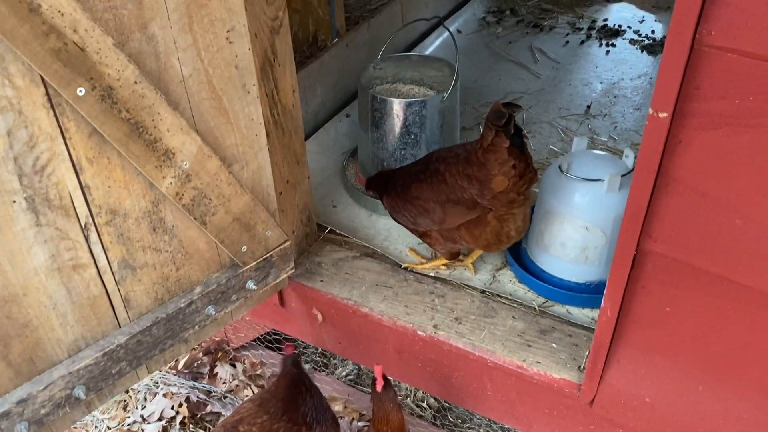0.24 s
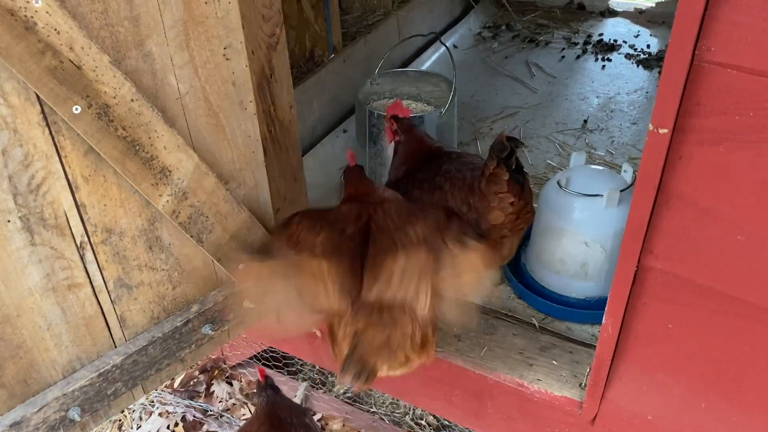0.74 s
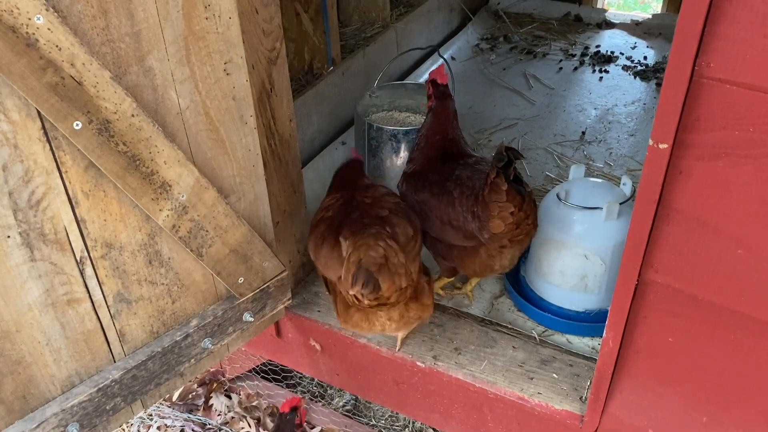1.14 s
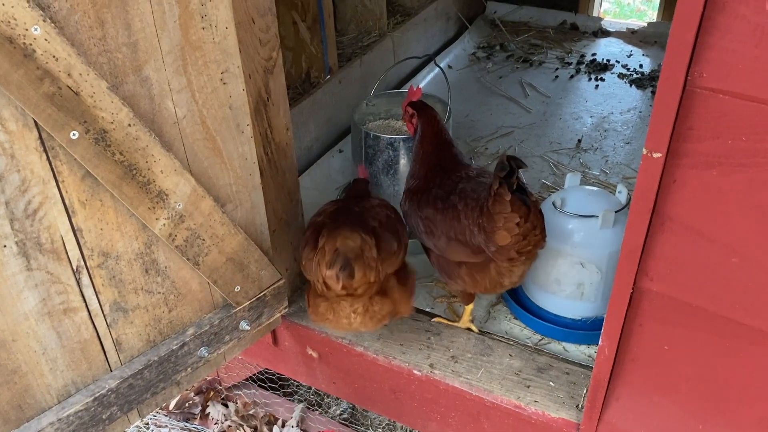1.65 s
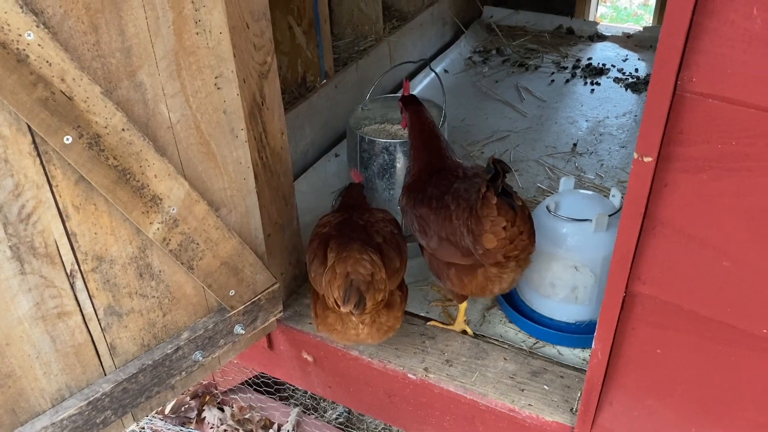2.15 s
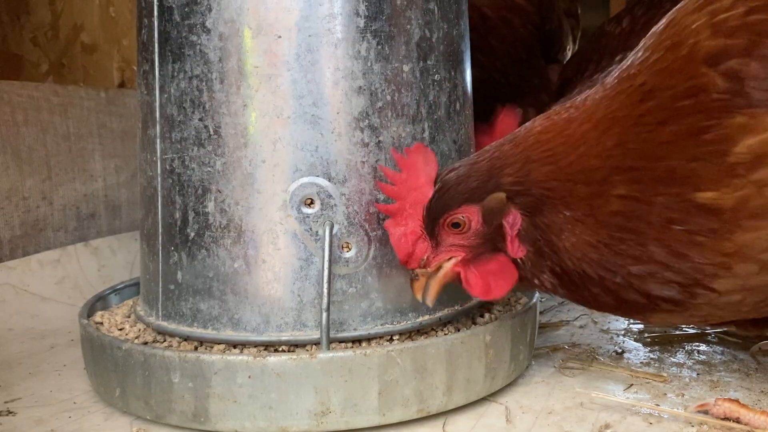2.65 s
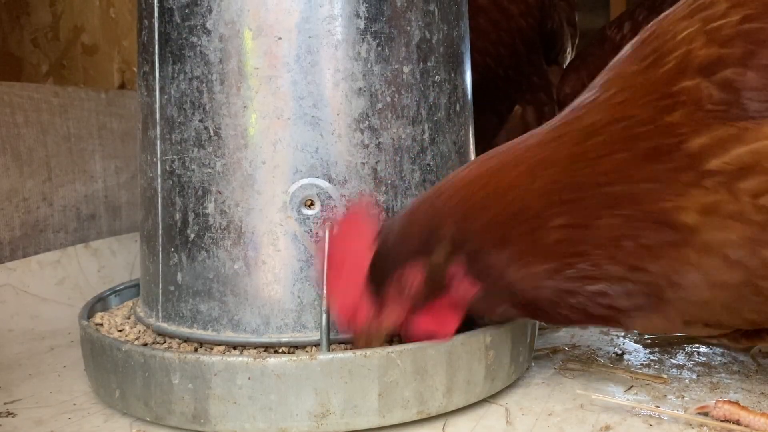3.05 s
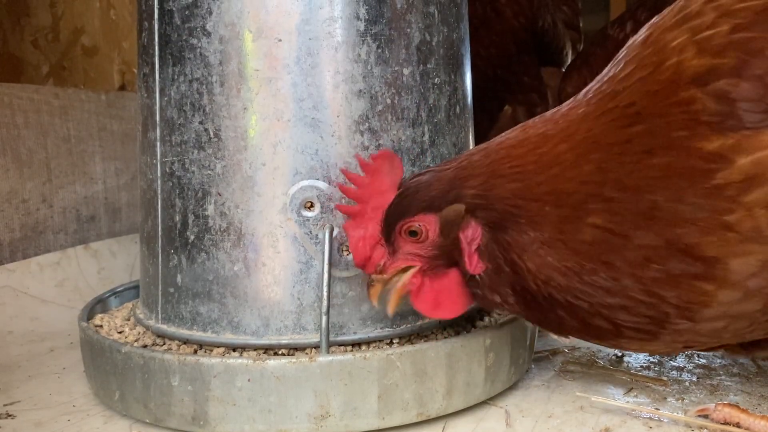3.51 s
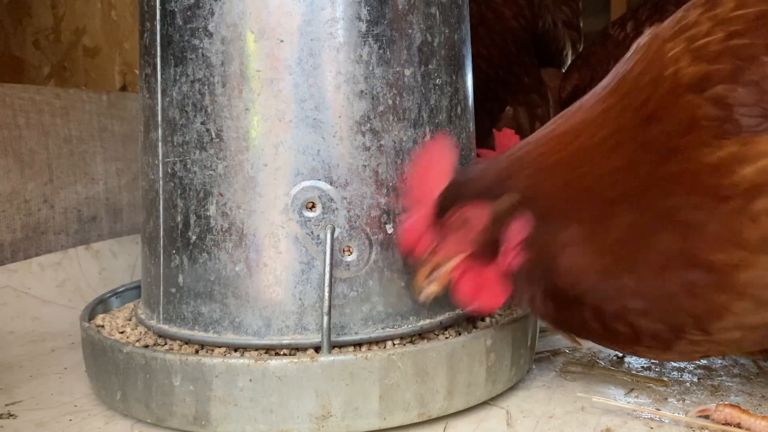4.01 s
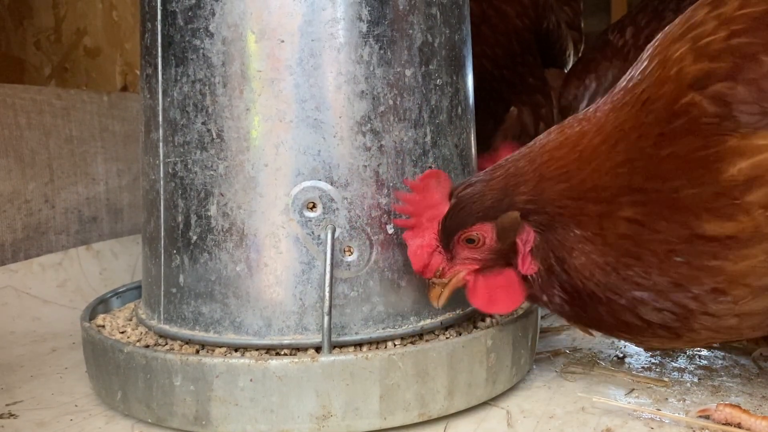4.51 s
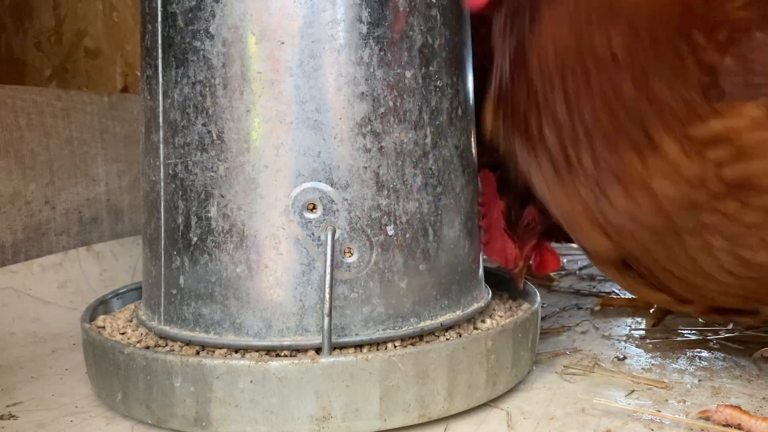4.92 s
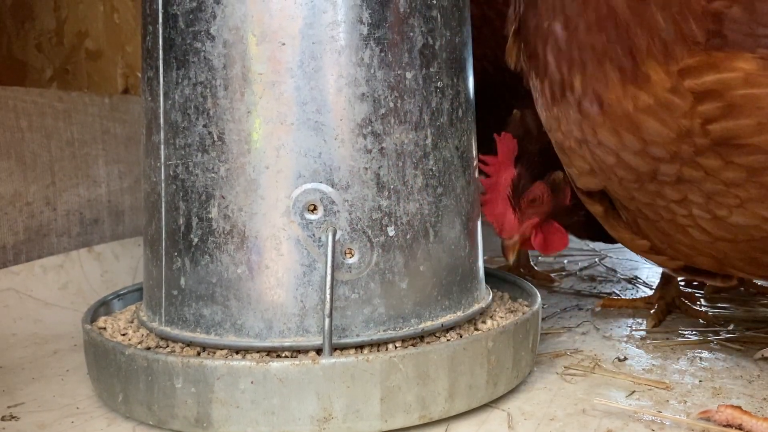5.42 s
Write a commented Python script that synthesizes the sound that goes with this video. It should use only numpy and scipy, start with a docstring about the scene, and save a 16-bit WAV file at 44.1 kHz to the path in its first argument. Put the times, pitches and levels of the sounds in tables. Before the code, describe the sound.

In a small wooden chicken coop, straw and feathers rustle, claws tap and feet knock on hollow boards while hens cluck briefly. A swell of scratchy handling noise brushes the microphone and cuts off. The rest is close-up feeding: a hen's beak ticks against a metal pan, crunching and shifting pellets, and clacks between pecks as she swallows. The pan occasionally rings lightly, over a soft low rumble and quiet yard air.

```python
"""A hen pecks pellets from a steel feeder pan, close up: each peck is a hard tap and a short crunch of
feed, coloured by the damped pan, and between pecks her beak clacks as she swallows.
Before that, hens scuffle through litter, flap up into a wooden coop, thud on its hollow floor and cluck
(throat pulses through resonances), and a hand rubs on the camera. Under it all the coop rumbles and
booms in faint outdoor air, and its close walls add a short tail."""
import sys
import numpy as np
from scipy import signal
from scipy.fft import rfft, irfft
from scipy.io import wavfile
from scipy.ndimage import uniform_filter1d

SR = 44100
rng = np.random.default_rng(int(sys.argv[2]) if len(sys.argv) > 2 else 0)


def master_out(mix):
    """Clip the mix to full scale and print it as 16-bit PCM to the path in sys.argv[1]."""
    frames = np.transpose(np.atleast_2d(mix))
    ceiling = np.clip(frames, -1, 1)
    pcm = np.round(ceiling * 32767).astype(np.int16)
    wavfile.write(sys.argv[1], SR, pcm)


N = 249914
HZ = np.fft.rfftfreq(N, 1 / SR)
NOW = np.arange(N) / SR
CLOSE_UP_S = 2.27  # from here on the microphone is next to the pan

# feed or litter giving way: t/s, length/s, level/dB, brightness/dB
CRUNCHES = [(0.248, 0.028, -48, 3), (0.392, 0.027, -51, 6.5), (0.518, 0.0097, -48.5, 8.5),
            (0.545, 0.023, -42.5, -3), (.57, 0.033, -42.5, -3), (.892, 0.03, -54.5, -17.5),
            (1.462, 0.018, -51, -8), (1.633, 0.0058, -51.5, -0.5), (2.377, 0.028, -53, -2.5),
            (2.755, 0.02, -45, 0.5), (2.951, .02, -61, -6), (2.971, 0.011, -52.5, -1),
            (3.013, 0.013, -48, 0), (3.269, 0.024, -50.5, -5), (3.532, 0.01, -50, -2),
            (3.578, 0.017, -50.5, -8), (3.646, .02, -66, 1.5), (3.688, 0.022, -62, 3),
            (3.78, 0.011, -55, -9.5), (3.826, 0.018, -61.5, -2.5), (3.884, 0.018, -53, -7.5),
            (4.225, 0.013, -51, -10.5), (4.386, 0.014, -53, 0.5), (4.558, 0.0089, -52, -0.5),
            (4.959, .021, -52, 2), (4.995, .037, -56, 3), (5.608, 0.021, -60.5, -4.5),
            (5.645, 0.011, -54, -5)]
# the beak snapping shut: t/s, mouth level/dB, tick level/dB
CLACKS = [(1.1414, -71, -56), (1.309, -63, -50.5), (2.495, -52, -55), (2.509, -52, -58.5),
          (2.539, -58, -54), (2.7244, -57, -50.5), (2.731, -48, -68), (2.8806, -77, -59),
          (2.8983, -63, -60), (3.1155, -61, -66), (3.1427, -58, -59), (3.3838, -49.5, -53),
          (3.4006, -47, -53.5), (3.44, -59, -66), (3.6873, -50, -49.5), (3.703, -55, -47),
          (3.732, -47.5, -81), (3.7929, -72, -50), (3.9976, -58, -53.5), (4.0149, -44, -49.5),
          (4.0441, -48, -58), (4.0819, -53, -63), (4.1355, -57.5, -48.5), (4.1534, -64, -51),
          (4.3476, -44.5, -49), (4.454, -51.5, -58), (4.6677, -51, -53), (4.6795, -48, -45),
          (4.702, -39.5, -73), (4.8117, -64, -53), (5.106, -68, -52.5), (5.6036, -64, -55)]
# feet and pecks shaking the floor: t/s, level/dB, share of low thud against board ring/0-1
STEPS = [(0.059, -36, 0.99), (0.458, -44, 0), (.52, -45, 0), (.894, -25.5, 0.01), (0.933, -34, 0.01),
         (.955, -31.5, 0.2), (0.987, -31, 0.38), (1.045, -32, 0.44), (1.107, -32.5, 0.93), (1.135, -46, .4),
         (1.206, -36, 0.56), (1.226, -43, 0.67), (1.383, -43, .99), (1.443, -33, 1), (1.586, -40, 0.6),
         (1.643, -35, 0.4), (2.01, -45, 1), (2.179, -41.5, 0.84), (2.376, -51.5, 0.26), (2.763, -43.5, 0.8),
         (3.289, -43, 0.34), (3.593, -44, 0.37), (4.397, -37.5, .79)]
# envelope of pellets shifting between pecks, highest while she feeds most eagerly: t/s, level/dB
FEEDING = [(2.27, -71.5), (2.7, -68.5), (3.2, -84), (3.65, -63.5), (4.45, -65), (4.85, -69), (5.25, -74),
           (5.67, -68.5)]
# envelope of the low rumble as the hens move about: t/s, level/dB
BUSTLE = [(0, -42.5), (.13, -53), (.2, -44.5), (.58, -46), (.74, -52.5), (.93, -56.5), (1.13, -36.5),
          (1.33, -46), (1.47, -37.5), (1.55, -53), (1.7, -48.5), (1.93, -54.5), (2.16, -45.5),
          (2.27, -52.5), (3.5, -51), (3.7, -46), (4.05, -52.5), (4.8, -56), (5.15, -52.5), (5.67, -55.5)]
# body, crack, sizzle and sparkle of a contact: low f/Hz, high f/Hz
BANDS = [(400, 1500), (1500, 5000), (5000, 9000), (9000, 16000)]


def taps(rise_s=0.00014, decay_s=0.00059, shudder_s=0.0032, shudder_db=-17, onset_s=0.0023, onset_db=-17):
    """A hard tap of beak or claw with a brief soft onset; what was hit shudders briefly."""
    # hard contacts: t/s, level/dB, brightness/dB
    hits = [(.245, -35.5, 4), (.402, -38.5, 9), (.54, -34, 1), (0.8904, -37.5, 9.5), (1.457, -36.5, 3.5),
            (1.625, -45.5, -0.5), (2.3743, -45.5, -4.5), (2.3872, -46, -3), (2.6529, -40.5, 0.5),
            (2.7499, -44.5, -8), (2.7661, -41.5, 2), (2.8338, -52, -6), (2.9771, -52, -0.5),
            (3.2788, -41, 1.5), (3.286, -36.5, 2.5), (3.532, -51, 1.5), (3.5911, -46, 6.5),
            (3.7778, -53.5, -12.5), (3.8871, -45, -1), (4.2268, -46.5, 1), (4.237, -41, -5),
            (4.288, -53, 11.5), (4.374, -44, -6.5), (4.3919, -34.5, -5), (4.5648, -47.5, -12.5),
            (4.5878, -47.5, 1), (5.0086, -48, 4.5), (5.6179, -47.5, -2), (5.6495, -46.5, -7),
            (5.6644, -36, 6.5)]
    early_s = 0.008  # the soft onset starts ahead of the blow
    out, t = np.zeros(N), NOW[:SR // 20] - early_s
    after = np.maximum(t, 0)
    dying = np.exp(-after / decay_s) + amp(shudder_db) * np.exp(-after / shudder_s)
    blow = (1 - np.exp(-after / rise_s)) * dying
    press = blow + amp(onset_db) * np.exp(-abs(t) / onset_s)
    for s, db, bright_db in hits:
        levels_db = band_levels([-5, -1, -5.5, -10.5], db, bright_db)
        add(out, s - early_s, contact(press * rng.standard_normal(len(t)), 0.0017, levels_db))
    return out


def crunches(per_s=2200, spread_db=4, rise_s=0.0019, settle_s=0.0075, grit=0.56):
    """Pellets or litter grind together under a push, then settle."""
    out, t = np.zeros(N), NOW[:SR // 10]
    for s, length, db, bright_db in CRUNCHES:
        push = np.minimum(t / rise_s, 1) * np.exp(-np.maximum(t - 0.68 * length, 0) / settle_s)
        force = push * (grains(len(t), per_s, spread_db) + grit * rng.standard_normal(len(t)))
        add(out, s, contact(force, length, band_levels([-4.5, -0.5, -4.5, -10.5], db, bright_db)))
    return out


def band_levels(colour_db, db, bright_db):
    """Levels of the four contact bands: a harder contact trades body for treble."""
    # tilt of body, crack, sizzle and sparkle: gain/dB per dB of brightness
    hardness = [-0.99, 0.27, 1.18, 1.8]
    return db + np.array(colour_db) + bright_db * np.array(hardness)


def contact(force, length_s, levels_db, detune=0.078):
    """A force excites the damped pan, a little differently at each place struck; each band is levelled."""
    # modes of the pan full of feed: f/Hz, width/Hz, level/dB
    modes = [(660, 52, 2), (1091, 47, 0.5), (2234, 107, 12.5), (2890, 740, 9.5), (3540, 210, 4.5),
             (5620, 84, 0), (7040, 250, 0.5)]
    shifts = np.exp(detune * rng.standard_normal(len(modes)))
    pan = sum(amp(db) * resonate(force, hz * shift, width) for (hz, width, db), shift in zip(modes, shifts))
    struck, out = hopper_echo(force + pan), 0
    for band, db in zip(BANDS, levels_db):
        part = butterworth(struck, 4, band, "band")
        out = out + amp(db) * part * np.sqrt(length_s * SR / np.sum(part ** 2))
    return out


def hopper_echo(x, nearest_s=0.0007, farthest_s=0.0024, echo_db=-6):
    """The steel hopper throws each contact straight back, from a distance that changes from peck to peck."""
    delay = round(rng.uniform(nearest_s, farthest_s) * SR)
    return x + amp(echo_db) * np.pad(x, (delay, 0))[:len(x)]


def ringing():
    """The steel pan rings out when its bare rim is struck; knocks, fittings and her mouth ring briefly."""
    # blows on the rim: t/s, level/dB, pitch factor from the place struck
    rim_hits = [(2.6536, -49, 0.97), (3.532, -59, 0.9)]
    # free modes of the pan: f/Hz, level/dB, t60/s
    pan_modes = [(373.5, -5.5, 0.42), (860, -9.5, 0.26), (1079, -7, 0.47), (1500, -17, 0.17),
                 (1884, -8, 0.2), (2750, 4.5, 0.079), (3970, 1, 0.078), (3700, -12, 0.088),
                 (4730, 0, 0.075), (5780, 15.5, 0.029), (6350, 0, 0.074), (7300, -14, 0.057)]
    # short pitched rings of knocks, fittings and the hen's mouth: t/s, f/Hz, level/dB, t60/s
    short_rings = [(.246, 1830, -32, 0.068), (.245, 2580, -29.5, 0.018), (.891, 2277, -24, 0.024),
                   (0.89, 3060, -36, .018), (.9, 1953, -36, 0.054), (1.14, 3540, -56, 0.059),
                   (1.457, 5570, -30, 0.021), (1.457, 4250, -34, .025), (2.374, 2040, -29, 0.0083),
                   (2.757, 2940, -47, 0.055), (2.834, 2290, -44, 0.014), (3.279, 5750, -35, 0.026),
                   (3.533, 3300, -50, 0.13), (4.237, 2250, -40.5, .04), (4.374, 1200, -39, 0.024),
                   (4.588, 2420, -36, 0.012), (5.008, 3020, -27.5, 0.0093), (5.008, 4150, -39, .025)]
    out = np.zeros(N)
    for s, db, factor in rim_hits:
        add(out, s, amp(db) * ring(pan_modes, factor))
    for s, hz, db, t60 in short_rings:
        add(out, s, ring([(hz, db, t60)]))
    return out


def scatter(crunch, settle_s=0.039, gain_db=-11):
    """The sharper a crunch, the more bits it throws up to patter back down."""
    keep = np.exp(-1 / (settle_s * SR))
    sharp = butterworth(crunch, 3, BANDS[1][0], "high")
    thrown = np.sqrt(signal.lfilter([1 - keep], [1, -keep], sharp ** 2))
    return amp(gain_db) * thrown * unit(diffuse(pellets(1162, 7560, per_s=700, cycles=4.9, spread_db=9)))


def clacks(mouth_decay_s=0.0028, tick_decay_s=0.00063, tick_hz=7100, wetness=0.42, gain_db=6):
    """The horn of the beak ticks and the mouth cavity rings for a few cycles."""
    out, t = np.zeros(N), NOW[:SR // 30]
    mouth_envelope = np.exp(-t / mouth_decay_s) * (1 - np.exp(-t / 0.00049))
    for (s, mouth_db, tick_db), hz in zip(CLACKS, mouth_pitches()):
        snap = rng.standard_normal(len(t)) * np.exp(-t / tick_decay_s)
        tick = resonate(snap, tick_hz * rng.uniform(0.83, 1.16), width_hz=1700) + 0.14 * snap
        tick *= np.sqrt(tick_decay_s * SR / np.sum(tick ** 2))
        smack = unit(resonate(rng.standard_normal(len(t)), hz, width_hz=290))
        mouth = (np.sin(2 * np.pi * hz * t) + wetness * smack) * mouth_envelope
        add(out, s, amp(mouth_db) * mouth + amp(tick_db) * tick)
    return amp(gain_db) * out


def mouth_pitches(front_hz=1352, back_hz=1050, swallow_s=0.035, pause_s=0.12):
    """The mouth resonance sinks from clack to clack as the feed moves back; a pause starts a new bout."""
    pitches, began, last = [], 0, 0
    for s, *_ in CLACKS:
        if s - last > pause_s:
            began = s
        pitches.append(back_hz + (front_hz - back_hz) * np.exp((began - s) / swallow_s))
        last = s
    return pitches


def nibbling(rattle_db=-4, mouth_db=-1, clump_db=1.5):
    """Loose pellets tick in clumps in the pan and roll in the hollow of the mouth."""
    # EQ of pan and mouth: f/Hz, level/dB
    pan_eq = [(500, -12), (2000, -3), (3500, 3), (5000, 2.5), (7200, 4), (9500, -6), (16000, 6)]
    mouth_eq = [(400, -25), (850, -19.5), (1130, 7), (1550, -13), (3000, -21)]
    rattle = diffuse(pellets(1485, 14330, per_s=2200, cycles=9, spread_db=0), pan_eq)
    mouth = diffuse(pellets(845, 1595, per_s=260, cycles=5, spread_db=4.5), mouth_eq)
    clumps = amp(clump_db * unit(uniform_filter1d(rng.standard_normal(N), size=1500)))
    return amp(rattle_db) * pan_stir() * unit(rattle * clumps) + amp(mouth_db) * mouthful() * unit(mouth)


def pan_stir(peck_db=-12, clack_db=-11, rise_s=0.0024, fade_s=0.024):
    """Envelope of loose feed in the close-up: a little all the time, more after each peck and clack."""
    pecked = [(s, length, db + peck_db) for s, length, db, _ in CRUNCHES if s > CLOSE_UP_S]
    spilled = [(s, rise_s, tick_db + clack_db) for s, _, tick_db in CLACKS if s > CLOSE_UP_S]
    return np.hypot(level(FEEDING), swells(pecked + spilled, rise_s, fade_s))


def mouthful(clack_db=-14, peck_db=-15, feeding_db=-2, rise_s=0.0039, head_lift_s=4.85):
    """Envelope of feed rolling in the mouth, most after pecks and clacks, until she lifts her head."""
    picked = [(s, length, db + peck_db) for s, length, db, _ in CRUNCHES if s > CLOSE_UP_S]
    tossed = [(s, rise_s, db + clack_db) for s, db, _ in CLACKS]
    rolling = np.hypot(swells(picked, rise_s, fade_s=0.061), swells(tossed, rise_s, fade_s=0.026))
    return np.hypot(rolling, amp(feeding_db) * level(FEEDING)) * (NOW < head_lift_s)


def pellets(low_hz, high_hz, per_s, cycles, spread_db, count=36):
    """Many small things knock together, each ringing for a few cycles at its own pitch."""
    out, t = np.zeros((2, N)), NOW[:SR // 40]
    for hz in np.geomspace(low_hz, high_hz, count):
        tick = np.sin(2 * np.pi * hz * t) * np.exp(-t * hz / cycles) * np.sqrt(hz / low_hz)
        for channel in out:
            for when, size in rng.random((int(per_s / count * N / SR), 2)):
                add(channel, when * N / SR, amp(spread_db * min(-np.log(1 - size), 3)) * tick)
    return unit(out)


def steps(thud_hz=72, upper_hz=122, thud_t60=0.12, rise_s=0.00041, soft_db_per_octave=22):
    """Blows on the floor: the joists thud and the boards ring; a soft foot spares the high modes."""
    # modes of the hollow wooden floor: f/Hz, level/dB, t60/s
    boards = [(264.4, 0.5, 0.089), (284.8, -1.5, 0.089), (333.5, -5, 0.093), (458, -7, 0.07),
              (559, -5.5, 0.051), (652, -12, 0.11), (918, -14.5, 0.11)]
    out, corner_hz = np.zeros(N), boards[1][0]
    for s, db, soft in STEPS:
        slope = soft_db_per_octave * soft
        dulled = [(hz, g - slope * max(np.log2(hz / corner_hz), 0), t60) for hz, g, t60 in boards]
        thud = ring([(thud_hz, 0, thud_t60), (upper_hz, -3, thud_t60)])
        step = soft * thud + (1 - soft) * ring(dulled)
        add(out, s, amp(db) * step * (1 - np.exp(-NOW[:len(step)] / rise_s)))
    return out


def clucks(chest_hz=270, chest_width_hz=100, jitter=0.042, dull_hz=2100):
    """Short falling pulse trains with hoarse puffs: muffled by a shut beak, bright through an open one."""
    # t/s, length/s, start f/Hz, end f/Hz, level/dB, beak opening/dB, roughness/0-1
    calls = [(0.589, 0.04, 248, 208.6, -44, -11, 0.75), (0.814, .052, 295.3, 223.6, -43.5, -7, 0.7),
             (1.633, 0.034, 271.6, 216, -39.5, -22, 0.5), (1.813, 0.069, 227.2, 209, -42.5, 6, 0.36),
             (1.877, 0.037, 222.3, 214, -52, -4, 0.32), (5.32, .11, 231, 212, -69.5, 3, 0.74)]
    # formants of the throat with open beak: f/Hz, width/Hz, level/dB
    throat = [(620, 150, -2.5), (860, 25, -6.5), (1220, 61, -19), (1520, 36, -27), (1950, 53, -11)]
    out = np.zeros(N)
    for s, length, start_hz, end_hz, db, open_db, rough in calls:
        n = int(length * SR)
        waver = 1 + jitter * unit(uniform_filter1d(rng.standard_normal(n), size=120))
        turns = np.cumsum(np.linspace(start_hz, end_hz, n) * waver) / SR
        pulses = unit(sum(np.cos(2 * np.pi * k * turns) for k in range(1, 13)))
        puffs = unit(uniform_filter1d(np.exp(-2 * (turns % 1)) * rng.standard_normal(n), size=8))
        drive = ((1 - rough) * pulses + rough * puffs) * signal.windows.tukey(n, 0.5)
        drive = np.pad(drive, (0, SR // 50))
        formants = [(chest_hz, chest_width_hz, -open_db)] + throat
        voice = sum(amp(g) * resonate(drive, hz, width) for hz, width, g in formants)
        voice = butterworth(voice, 3, dull_hz, "low")
        add(out, s, amp(db) * voice / np.std(voice[:n]))
    return out


def rustling(gain_db=2):
    """Dry straw and feathers crackle finely, dying away once the hens are indoors."""
    # envelope of the rustle: t/s, level/dB
    rustle = [(0, -52), (.5, -50.5), (.76, -55), (.87, -65.5), (1.1, -69), (1.85, -80)]
    # scratching feet and wing beats: t/s, length/s, level/dB
    scuffles = [(0, 0.019, -43), (.2, 0.064, -45), (.345, 0.072, -45), (.465, 0.016, -47),
                (.525, 0.019, -44), (.755, 0.048, -52.5), (1.015, 0.011, -58.5)]
    # EQ of straw and feathers: f/Hz, level/dB
    straw_eq = [(300, -5.5), (700, 1), (1400, 0), (2400, 0), (3500, 2), (5500, 4), (8000, 1.5),
                (10000, -1.5), (16000, -2)]
    crackle = grains((2, N), per_s=5000, spread_db=3.8) + 0.36 * rng.standard_normal((2, N))
    stirred = np.hypot(level(rustle), swells(scuffles, rise_s=0.0047, fade_s=0.022))
    return amp(gain_db) * stirred * unit(diffuse(crackle, straw_eq))


def hand_rub():
    """Skin slides on the camera with a gritty swish, harder until it lets go."""
    # envelope of the slide: t/s, level/dB
    slide = [(1.8, -68), (1.87, -52.5), (2.1, -45), (2.235, -35), (2.248, -37.5), (2.256, -63)]
    # EQ of the friction: f/Hz, level/dB
    skin_eq = [(300, -7.5), (1000, -5), (2500, -6), (4500, 1), (6500, 0.5), (8500, -2.5), (10000, -4.5),
               (13000, -5.5), (16000, -7)]
    friction = grains((2, N), per_s=7200, spread_db=6.2) + rng.standard_normal((2, N))
    return level(slide) * unit(diffuse(friction, skin_eq))


def coop_reverb(x, first_echo_s=0.00286):
    """Close wooden walls give dense, quickly dying reflections."""
    # decay of the coop: f/Hz, t60/s
    decay = [(100, 0.15), (300, 0.55), (1000, 0.11), (4000, 0.16), (8000, 0.12), (16000, 0.082)]
    echoes = grains((2, SR // 2), per_s=4000, spread_db=0.42) * (NOW[:SR // 2] > first_echo_s)
    hz, t, spectra = signal.stft(echoes, SR, nperseg=256)
    tail = signal.istft(spectra * amp(-60 * t / read(decay, hz)[:, None]), SR, nperseg=256)[1]
    return diffuse(signal.fftconvolve(x[None], tail / np.linalg.norm(tail[0]), axes=1)[:, :N])


def background(rumble_db=-1, boom_db=-3, hollow_hz=280, hollow_width_hz=42, hollow_db=-9, air_db=-65.5):
    """Low stirring of the wooden coop, which hums at its hollow resonance, under faint outdoor air."""
    # EQ of the rumble, the floor's boom and the still yard air: f/Hz, level/dB
    rumble_eq = [(15, -66), (30, -7), (45, -0.5), (68, -1.5), (110, -3.5), (150, -11.5), (220, -19.5),
                 (500, -95)]
    boom_eq = [(80, -39), (150, 4), (210, 7), (290, -10), (380, -9), (600, -38), (1200, -30), (3000, -85)]
    air_eq = [(100, 12.5), (400, -4), (800, 4), (1300, -3.5), (2200, -3.5), (4000, -10), (7000, -15),
              (10000, -14.5), (16000, -22)]
    # a faint hollow hum swelling in the lull: t/s, level/dB
    hum = [(4.6, -63), (5.1, -56), (5.67, -55.5)]
    # the air is louder at the doorway than in the shelter of the feeder: t/s, level/dB
    shelter = [(0, 4.5), (2.24, 7.5), (2.3, -1), (4.6, -0.5), (4.9, -3), (5.67, 1.5)]
    rumble, boom, air = (unit(diffuse(rng.standard_normal((2, N)), eq))
                         for eq in (rumble_eq, boom_eq, air_eq))
    hollow = resonate(rng.standard_normal((2, N)), hollow_hz, hollow_width_hz)
    hollow = unit(diffuse(resonate(hollow, hollow_hz, 4 * hollow_width_hz)))
    body = amp(boom_db) * boom + amp(hollow_db) * hollow
    return (amp(rumble_db) * rumbling() * rumble
            + np.hypot(booming(), level(hum)) * body
            + amp(air_db) * level(shelter) * air)


def booming(bustle_db=-12, step_db=-14, push_db=-1, dull=0.42, rise_s=0.012, fade_s=0.052):
    """Envelope of the hollow floor: it booms with the bustle, each step and each dull push into feed."""
    stepped = [(s, rise_s, db + step_db) for s, db, _ in STEPS]
    pushed = [(s, length, db + push_db - dull * bright_db) for s, length, db, bright_db in CRUNCHES]
    return np.hypot(amp(bustle_db) * level(BUSTLE), swells(stepped + pushed, rise_s, fade_s))


def rumbling(push_db=-4, dull=0.47, rise_s=0.012, fade_s=0.084):
    """Envelope of the rumble: it follows the bustle, and each push into the feed shakes the joists."""
    pushed = [(s, length, db + push_db - dull * bright_db)
              for s, length, db, bright_db in CRUNCHES if s > CLOSE_UP_S]
    return np.hypot(level(BUSTLE), swells(pushed, rise_s, fade_s))


def diffuse(pair, eq=((1, 0), (20000, 0))):
    """Colours two unrelated signals and makes them as alike as the two microphones hear them."""
    # likeness of diffuse sound in left and right: f/Hz, coherence/0-1
    likeness = [(60, 0.96), (290, 0.9), (640, 0.3), (1500, 0.12), (3500, 0.23), (5500, 0.36), (7000, 0.91),
                (9000, 1), (16000, 0.95)]
    left, other = rfft(pair) * amp(read(eq, HZ))
    alike = read(likeness, HZ)
    return irfft([left, alike * left + np.sqrt(1 - alike ** 2) * other], N)


def grains(shape, per_s, spread_db):
    """Random tiny clicks, a few of them larger than the rest."""
    sizes = amp(spread_db * np.minimum(rng.exponential(1, shape), 4))
    return unit(sizes * rng.choice([-1, 1], shape) * (rng.random(shape) < per_s / SR))


def ring(modes, factor=1):
    """Free ringing of modes (f/Hz, level/dB, t60/s) after one blow."""
    t = NOW[:SR // 2]
    return sum(amp(db - 60 * t / t60) * np.sin(2 * np.pi * hz * factor * t) * rng.choice([-1, 1])
               for hz, db, t60 in modes)


def swells(events, rise_s, fade_s):
    """Envelope of events (t/s, length/s, level/dB) that each rise, hold and die away; their powers add."""
    power, t = np.zeros(N), NOW[:SR // 2]
    for s, length, db in events:
        swell = amp(db) * np.minimum(t / rise_s, 1) * np.exp(-np.maximum(t - length, 0) / fade_s)
        add(power, s, swell ** 2)
    return np.sqrt(power)


def resonate(x, hz, width_hz):
    """One resonance of gain 1."""
    return signal.lfilter(*signal.iirpeak(hz, hz / width_hz, fs=SR), x)


def butterworth(x, order, hz, kind):
    """Low-, high- or band-pass filter."""
    return signal.sosfilt(signal.butter(order, hz, kind, fs=SR, output="sos"), x)


def amp(db):
    """Decibels to gain."""
    return 10 ** (np.asarray(db) / 20)


def unit(x):
    """Scales to rms 1."""
    return x / np.sqrt(np.mean(x ** 2) + 1e-20)


def read(points, hz):
    """Reads a curve on a log-frequency axis."""
    f, value = np.transpose(points)
    return np.interp(np.log(hz + 1), np.log(f + 1), value)


def level(curve):
    """A dB envelope as a gain, silent outside its span."""
    return amp(np.interp(NOW, *np.transpose(curve), -120, -120))


def add(mix, s, sound):
    """Adds a sound at time s."""
    part = mix[max(round(s * SR), 0):][:len(sound)]
    part += sound[:len(part)]


def scene(peck_send_db=-8, beak_send_db=-10, hen_send_db=-10):
    """All sources together; pecks, beak, steps and clucks also feed the coop's reverb."""
    crunch = crunches()
    pecks = taps() + crunch + ringing()
    beak = clacks()
    hens = steps() + clucks()
    room = coop_reverb(amp(peck_send_db) * pecks + amp(beak_send_db) * beak + amp(hen_send_db) * hens)
    return pecks + scatter(crunch) + beak + hens + room + rustling() + hand_rub() + nibbling() + background()


def record(dry, low_cut_hz=38, high_cut_hz=15800):
    """The microphone pair leans left, differs in phase in the treble and drops deep bass and the very top."""
    # stereo balance: f/Hz, left minus right/dB
    balance = [(100, -0.2), (500, 2), (3000, 0.98), (5000, 3), (7500, 0), (16000, 0)]
    # phase between the microphones: f/Hz, lead of left/rad
    phase = [(0, 0), (2000, .3), (3200, .8), (5300, -.2), (7000, 0), (9000, -3.14), (11200, -6.28),
             (13300, -9.42), (15400, -12.57), (17000, -13)]
    lean = amp(read(balance, HZ) / 2)
    lead = np.exp(1j * np.interp(HZ, *np.transpose(phase)))
    heard = irfft(rfft(dry) * np.array([lean * lead, 1 / lean]), N)
    heard = butterworth(heard, 3, low_cut_hz, "high")
    high_cut = signal.firwin(511, high_cut_hz, window=("kaiser", 9), fs=SR)
    return signal.oaconvolve(heard, high_cut[None], "same")


dry = scene()
out = record(dry)
master_out(out)
```